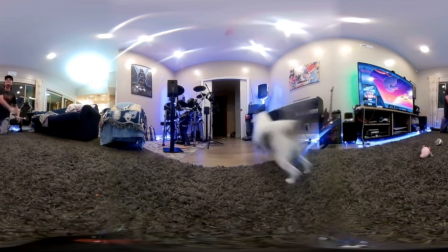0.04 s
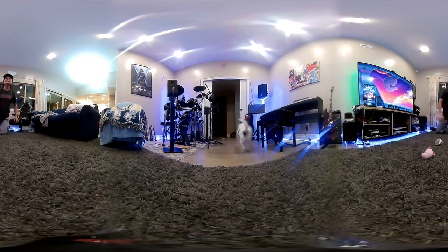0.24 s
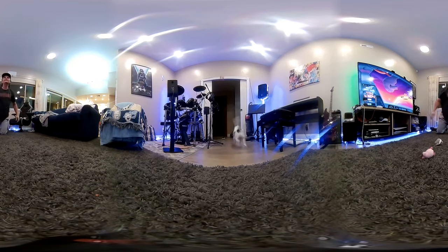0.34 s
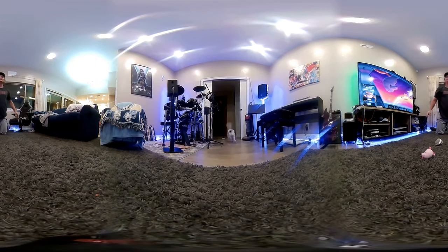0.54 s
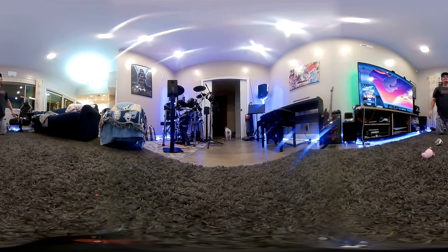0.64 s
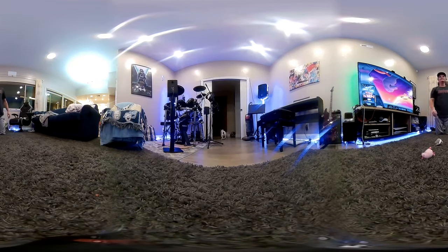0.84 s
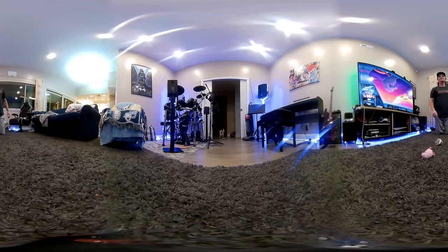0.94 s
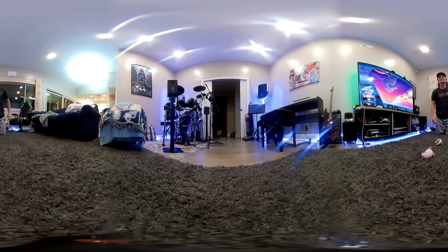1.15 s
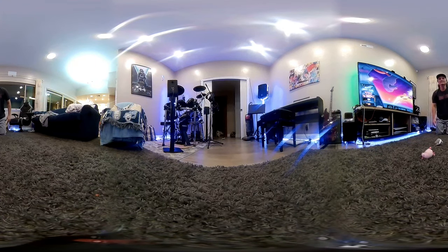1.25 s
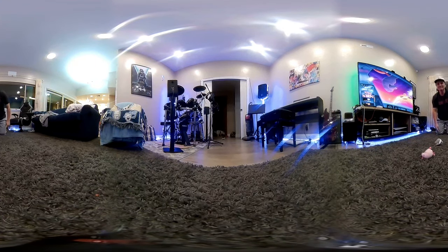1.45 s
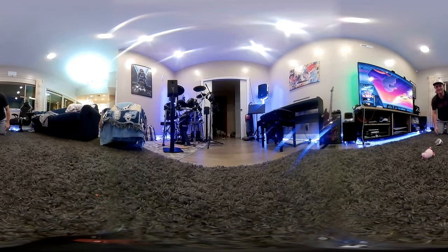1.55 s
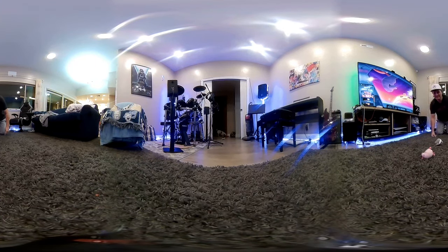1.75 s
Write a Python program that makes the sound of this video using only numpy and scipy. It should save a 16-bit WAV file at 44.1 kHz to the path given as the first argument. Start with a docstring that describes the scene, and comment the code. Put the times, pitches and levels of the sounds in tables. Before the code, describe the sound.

A small dog's claws and paws scrabble across a hard wooden floor, then run off indoors

```python
"""Small dog chasing a toy indoors

A small dog scrabbles across a wooden floor after a toy, heard from floor level.
Seven paw drags are bursts of tiny catches; claws ring and snag, pads knock, the floor thumps.
The room rings on for about half a second, over air, a faint mains hum, a deep rumble and rustles."""
import sys
import numpy as np
from scipy import signal
from scipy.fft import rfft, irfft
from scipy.io import wavfile

SR = 44100
rng = np.random.default_rng(int(sys.argv[2]) if len(sys.argv) > 2 else 0)


def master(y):
    """Save y as 16-bit WAV."""
    cut = np.clip(np.atleast_2d(y).T, -1, 1)
    pcm = np.round(cut * 32767)  # scale
    wavfile.write(sys.argv[1], SR, pcm.astype(np.int16))


N = 79380  # samples, 1.8 s


def undb(db):
    """Decibels to gain."""
    return 10 ** (np.asarray(db) / 20)


def unit(x):
    """Scale to rms 1."""
    return x / np.sqrt(np.mean(x ** 2))


def noise():
    """White noise."""
    return rng.standard_normal(N)


def times():
    """Time of every sample, in seconds."""
    return np.arange(N) / SR


def freqs():
    """Frequency of every spectral bin in Hz, at least 1 so that logs work."""
    return np.maximum(np.arange(N // 2 + 1) * SR / N, 1)


def along(points, hz):
    """Read a table on a log-frequency axis."""
    table_hz, values = np.array(points).T
    return np.interp(np.log(hz), np.log(table_hz), values)


def colour(x, points, tilt_db=0):
    """Give x a spectral colour, tilted in dB per octave; rms 1."""
    gain_db = along(points, freqs()) + tilt_db * np.log2(freqs())
    return unit(irfft(rfft(x) * undb(gain_db), N))


def resonate(x, hz, width_hz):
    """A steep two-pass resonance, about 6 dB down at width_hz either side of a narrow peak; rms 1."""
    f = freqs()
    detuning = .5 * (f / hz - hz / f) * hz / width_hz
    return unit(irfft(rfft(x) / (1 + 1j * detuning) ** 2, N))


def walk(rate):
    """Random wander of rms 1: straight lines between `rate` random points a second."""
    steps = noise()
    return unit(np.interp(times() * rate, np.arange(N), steps))


def swell(start, rise, hold, release):
    """Linear rise, hold and exponential release (time constant), all in seconds."""
    t = times() - start
    fade = np.exp(-np.maximum(t - rise - hold, 0) / release)
    return np.clip(t / rise, 0, 1) * fade


def blow(start, decay, rise=0.00064):
    """A sudden contact that dies away."""
    return swell(start, rise, 0, decay)


CATCHES_PER_S, CATCH_SPREAD_DB = 2500, 2
SCRAPE_HISS_DB = 1.5  # hiss of the scrape relative to the catches


def catches():
    """Stick-slip: many tiny catches of uneven size over the soft hiss of the scrape."""
    hit = rng.random(N) < CATCHES_PER_S / SR
    # many small catches and a few bigger ones, with a ceiling
    size = undb(CATCH_SPREAD_DB * np.minimum(rng.exponential(size=N), np.pi))
    clicks = unit(hit * size * np.sign(noise()))
    return unit(clicks + undb(SCRAPE_HISS_DB) * noise())


# Paw drags. Each row: start, rise, hold and release in seconds, level in dB before the room,
# treble tilt in dB per octave.
PAW_SCRAPES = [(.209, 0.049, 0.023, 0.029, -36, 2.6), (0.393, 0.019, 0.091, 0.047, -39.5, 1.5),
               (0.549, 0.056, 0.061, 0.022, -36.5, 0.5), (0.759, 0.053, 0.02, 0.032, -34.5, 1),
               (0.889, .02, 0.037, 0.015, -44.5, -2.5), (0.944, .055, 0.081, 0.043, -36, 1),
               (1.151, 0.045, 0.014, 0.021, -37, 2.5)]
# Colour of paw on wooden floor, shared by the claw crack. Each row: frequency in Hz, relative level in dB.
SCRAPE_SPECTRUM = [(150, -16.5), (500, -13), (900, -7.5), (1400, -7.5), (2200, -4.5), (3200, -1),
                   (5000, 0.5), (7600, -3), (9000, -8.5), (12000, -16.5), (15500, -22)]
JUDDER_DB, JUDDER_PER_S = 1.5, 100  # rms wander of the grip, random points per second


def scrapes():
    """Paws drag with a juddering grip: coloured catches whose level wanders quickly."""
    out = 0
    for start, rise, hold, release, db, tilt in PAW_SCRAPES:
        grip = undb(db + JUDDER_DB * walk(JUDDER_PER_S))
        drag = colour(catches(), SCRAPE_SPECTRUM, tilt)
        out = out + grip * swell(start, rise, hold, release) * drag
    return out


# Claw strikes. Each row: start in seconds, level in dB of the lower ring before the room,
# frequency in Hz of the lower ring.
CLAW_STRIKES = [(.2090, -40.5, 3520), (0.245, -34, 4230), (0.34, -40, 2270), (.4135, -32.5, 3300),
                (0.4577, -34.5, 2980), (0.5863, -30.5, 2580), (0.6337, -33, 2800), (0.732, -41, 2040),
                (0.7897, -41, 2600), (.8180, -33, 2280), (0.981, -33, 2330), (1.0110, -34.5, 2340),
                (1.07, -40, 2130), (1.1761, -35, 2140)]
CLAW_RISE_S, CLAW_HOLD_S, CLAW_DECAY_S = 0.0017, 0.0026, 0.0048
CLAW_WIDTH_HZ = 700
CLAW_UPPER_DB, CLAW_CRACK_DB = -7, -13.5  # relative to the lower ring


def claws():
    """Claws chatter for a few milliseconds in two resonances an octave apart, with a faint crack."""
    out = 0
    for start, db, hz in CLAW_STRIKES:
        lower = resonate(noise(), hz, CLAW_WIDTH_HZ)
        upper = undb(CLAW_UPPER_DB) * resonate(noise(), 2 * hz, 2 * CLAW_WIDTH_HZ)
        crack = undb(CLAW_CRACK_DB) * colour(catches(), SCRAPE_SPECTRUM)
        envelope = swell(start, CLAW_RISE_S, CLAW_HOLD_S, CLAW_DECAY_S)
        out = out + undb(db) * envelope * (lower + upper + crack)
    return out


# Sharp snags of a claw tip. Each row: start in seconds, level in dB before the room.
TIP_SNAGS = [(0.259, -38), (0.329, -41.5), (0.428, -33.5), (0.475, -36.5), (.602, -56), (.631, -57),
             (0.6439, -31.5), (0.747, -49)]
# Colour of a snag. Each row: frequency in Hz, relative level in dB.
SNAG_SPECTRUM = [(1000, -14.5), (5500, -22), (7400, 5.5), (9000, -8), (11000, -3.5), (15500, -15)]
SNAG_RISE_S, SNAG_HOLD_S, SNAG_DECAY_S = 0.0011, 0.0022, 0.0073


def snags():
    """Claw tips snag with a bright tick: short bursts of coloured noise."""
    out = 0
    for start, db in TIP_SNAGS:
        envelope = swell(start, SNAG_RISE_S, SNAG_HOLD_S, SNAG_DECAY_S)
        out = out + undb(db) * envelope * colour(noise(), SNAG_SPECTRUM)
    return out


# Pad knocks. Each row: start in seconds, level in dB before the room, floor resonance in Hz,
# decay time constant in seconds.
PAD_KNOCKS = [(0.076, -66, 745, 0.009), (.185, -58, 1400, 0.078), (0.189, -56.5, 560, 0.075),
              (0.229, -43, 880, 0.033), (0.243, -45, 1330, 0.021), (.260, -45.5, 780, 0.0076),
              (0.342, -42, 560, 0.008), (0.354, -40, 790, 0.0068), (.415, -43, 790, 0.035),
              (0.541, -49.5, 730, 0.031), (0.632, -46, 870, 0.041), (.732, -42, 600, 0.011),
              (0.828, -38, 1050, 0.013), (.902, -41, 800, 0.011), (.937, -42.5, 956, 0.017),
              (1.043, -46.5, 754, 0.005), (1.157, -40, 821, 0.046), (1.180, -39, 1130, 0.038),
              (1.216, -45.5, 680, 0.039)]
# Colour of the dull tap. Each row: frequency in Hz, relative level in dB.
TAP_SPECTRUM = [(100, -17), (300, 14.5), (1200, -5.5), (3000, 19.5), (6000, -45), (15000, -44)]
KNOCK_WIDTH = 0.47  # resonance width as a fraction of its frequency
KNOCK_TAP_DB, KNOCK_RING_DB = -6.5, -4.5  # tap and ring relative to resonance, tap after ring is in
KNOCK_WAVER, KNOCK_WAVER_PER_S = .08, 200  # rms pitch wander as a fraction, random points per second


def knocks():
    """Pads knock on the floor: a dull tap, a broad resonance and a ring of wavering pitch."""
    out = 0
    for start, db, hz, decay in PAD_KNOCKS:
        cycles = hz * np.cumsum(1 + KNOCK_WAVER * walk(KNOCK_WAVER_PER_S)) / SR
        ring = np.sqrt(2) * np.sin(2 * np.pi * cycles)
        body = resonate(noise(), hz, KNOCK_WIDTH * hz) + undb(KNOCK_RING_DB) * ring
        tap = undb(KNOCK_TAP_DB) * colour(catches(), TAP_SPECTRUM)
        out = out + undb(db) * blow(start, decay) * unit(body + tap)
    return out


# The dog's weight landing. Each row: start in seconds, level in dB before the room.
WEIGHT_THUMPS = [(0.073, -59), (0.197, -53.5), (0.243, -58.5), (0.336, -59), (.43, -56.5), (.55, -55.5),
                 (0.798, -54.5), (0.899, -52.5), (1.019, -58.5), (1.159, -61), (1.269, -59)]
THUMP_HZ, THUMP_WIDTH_HZ, THUMP_DECAY_S = 148.5, 104, .03


def thumps():
    """The floor thumps softly under the weight: a low, broad resonance that dies quickly."""
    out = 0
    for start, db in WEIGHT_THUMPS:
        boom = resonate(noise(), THUMP_HZ, THUMP_WIDTH_HZ)
        out = out + undb(db) * blow(start, THUMP_DECAY_S, rise=0.0037) * boom
    return out


# Distant last steps. Each row: start in seconds, level in dB before the room.
LAST_STEPS = [(1.351, -47.5), (1.376, -52.5), (1.437, -82), (1.502, -64), (1.645, -69.5)]
# Colour of a distant step. Each row: frequency in Hz, relative level in dB.
FAR_STEP_SPECTRUM = [(150, 0.5), (500, -3), (1000, -1.5), (2500, -8.5), (6000, -8.5), (9000, -18.5),
                     (15500, -26)]
FAR_STEP_DECAY_S = 0.0065


def far_steps():
    """Faint dull ticks as the dog runs off: short bursts of dark catches."""
    out = 0
    for start, db in LAST_STEPS:
        tick = colour(catches(), FAR_STEP_SPECTRUM)
        out = out + undb(db) * blow(start, FAR_STEP_DECAY_S) * tick
    return out


# Ring-out of the room. Each row: frequency in Hz, time to fall by 60 dB in seconds.
ROOM_DECAY = [(100, 0.53), (530, 0.55), (1400, 0.6), (3700, 0.52), (9700, 0.29), (16000, 0.33)]
ROOM_DB = -4.5  # tail relative to the direct sound
ROOM_DELAY_S, ROOM_BUILD_S = 0.0049, 0.015


def room(x, count=24):
    """Direct sound plus a diffuse, faster-dying-treble tail, redrawn per slice as the dog moves."""
    t, f = times()[:N // 2], freqs()[::2]
    centres = 2. ** np.arange(6, 15)[:, None]  # octaves from 64 Hz
    bands = np.maximum(1 - abs(np.log2(f / centres)), 0)
    build = np.clip((t - ROOM_DELAY_S) / ROOM_BUILD_S, 0, 1)
    fades = np.exp(-np.log(1000) * t / along(ROOM_DECAY, centres)) * build
    wet = np.zeros(2 * N)
    for place in np.array_split(np.arange(N), count):
        spray = irfft(bands * rfft(rng.standard_normal(len(t))), len(t))
        tail = np.sum(fades * spray, axis=0)
        echo = signal.fftconvolve(x[place], tail / np.linalg.norm(tail))
        wet[place[0]:place[0] + len(echo)] += echo
    return (x + undb(ROOM_DB) * wet[:N]) / np.hypot(1, undb(ROOM_DB))


# Faint rustles. Each row: start, rise, hold and release in seconds, level in dB.
FAINT_RUSTLES = [(-.05, 0.044, 0.19, 0.039, -68.5), (1.668, 0.07, .1, .05, -69.5)]
# Colour of a rustle. Each row: frequency in Hz, relative level in dB.
RUSTLE_SPECTRUM = [(200, 3.5), (800, -3.5), (1500, -1), (3000, -10.5), (6000, -9.5), (7500, -9),
                   (10000, -16), (15500, -19)]


def rustles():
    """Light rustling: the same tiny catches, darker and very soft."""
    out = 0
    for *shape, db in FAINT_RUSTLES:
        out = out + undb(db) * swell(*shape) * colour(catches(), RUSTLE_SPECTRUM)
    return out


# Thin rings. Each row: start, rise, hold and release in seconds, level in dB,
# frequency in Hz, resonance width in Hz.
THIN_RINGS = [(.165, .035, .04, .02, -59, 7150, 400), (1.73, .03, .06, .05, -74, 797, 18),
              (1.68, .03, .1, .05, -78, 7230, 300)]


def thin_rings():
    """Thin, faint rings: noise through a resonance narrow for its pitch."""
    out = 0
    for *shape, db, hz, width in THIN_RINGS:
        out = out + undb(db) * swell(*shape) * resonate(noise(), hz, width)
    return out


# Deep rumble over time. Each row: time in seconds, level in dB.
RUMBLE_LEVEL = [(0, -57.5), (.10, -60), (.15, -70.5), (1.1, -74), (1.45, -69.5), (1.8, -87.5)]


def rumble():
    """Deep rumble: noise through a broad resonance at 27 Hz, its level following the table."""
    level_db = np.interp(times(), *np.array(RUMBLE_LEVEL).T)
    return undb(level_db) * resonate(noise(), 27, 40)


HUM_HZ, HUM_DB = 59, -71


def hum():
    """Faint mains hum: one steady sine."""
    return undb(HUM_DB) * np.sqrt(2) * np.sin(2 * np.pi * HUM_HZ * times())


# Colour of the room air. Each row: frequency in Hz, relative level in dB.
AIR_SPECTRUM = [(20, -6), (45, 0), (80, -19), (130, -8), (220, -12), (350, -13.5), (800, -25.5),
                (2500, -32), (7000, -28.5), (15500, -32.5)]
AIR_DB = -71.5


def air():
    """Room air: steady noise, heaviest in the lows."""
    return undb(AIR_DB) * colour(noise(), AIR_SPECTRUM)


def scene():
    """The dog rings the room; the background is added without it."""
    dog = scrapes() + claws() + snags() + knocks() + thumps() + far_steps()
    background = rustles() + thin_rings() + rumble() + hum() + air()
    return (room(dog) + background)[None]


TOP_HZ = 15750


def record(dry):
    """The recorder cuts the top with a steep low-pass."""
    # 0.2 dB passband ripple, 80 dB stopband
    lowpass = signal.ellip(10, .2, 80, TOP_HZ, fs=SR, output="sos")
    return signal.sosfilt(lowpass, dry)


dry = scene()
out = record(dry)
master(out)
```